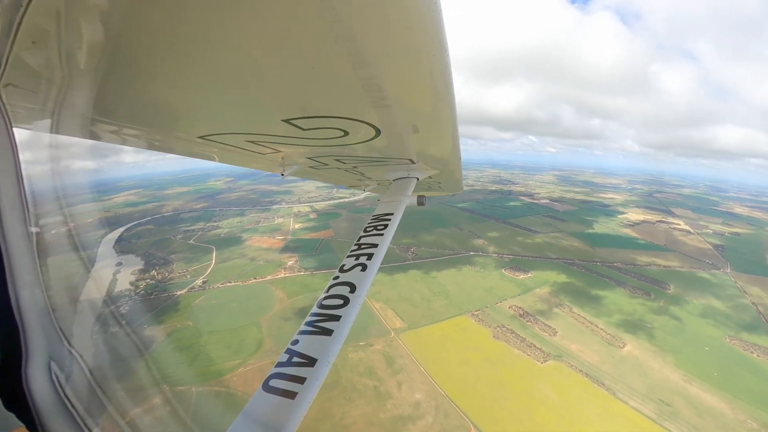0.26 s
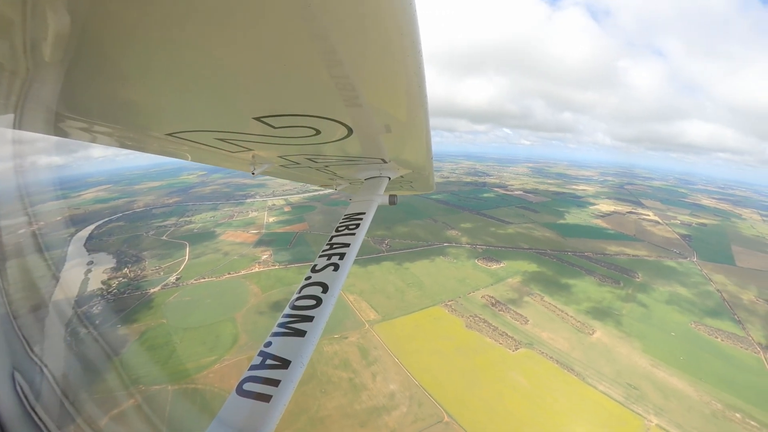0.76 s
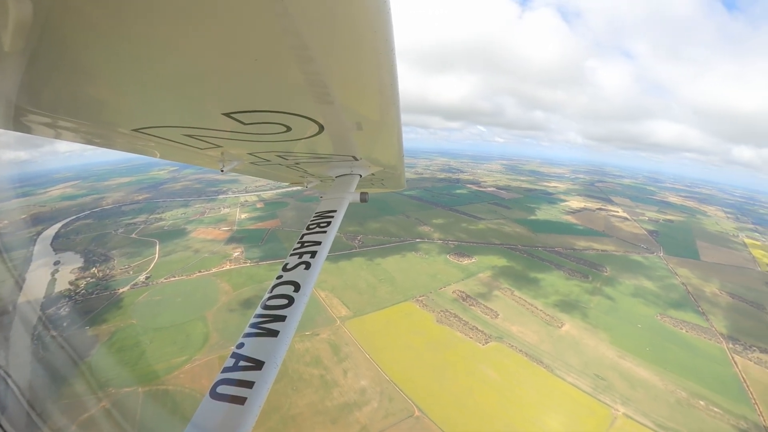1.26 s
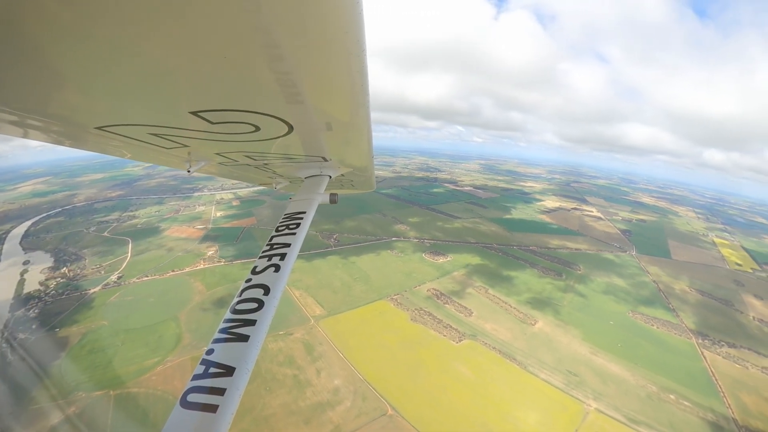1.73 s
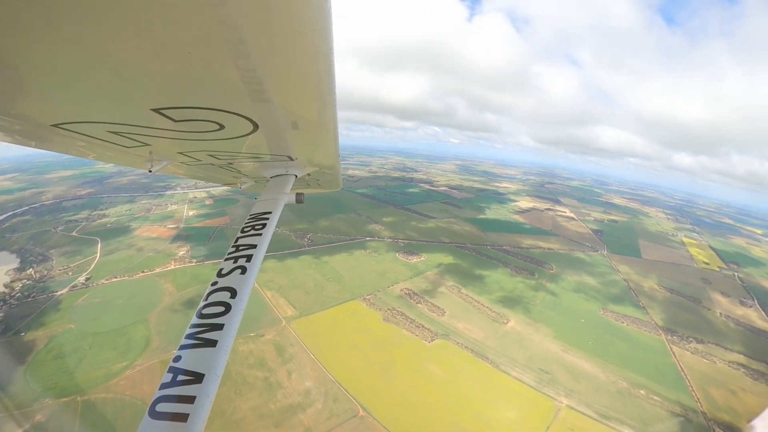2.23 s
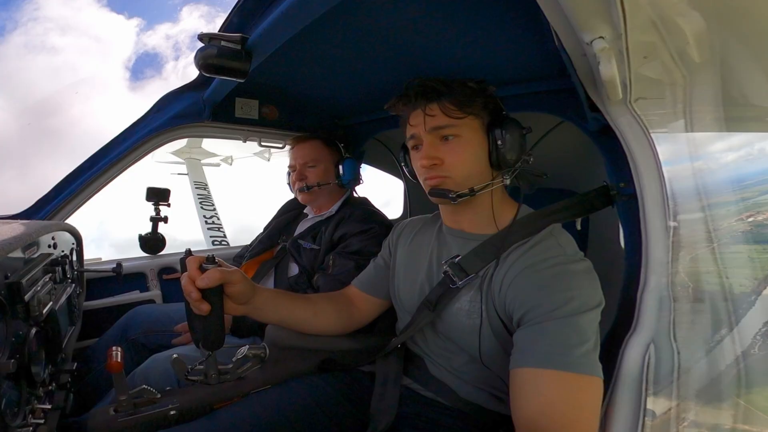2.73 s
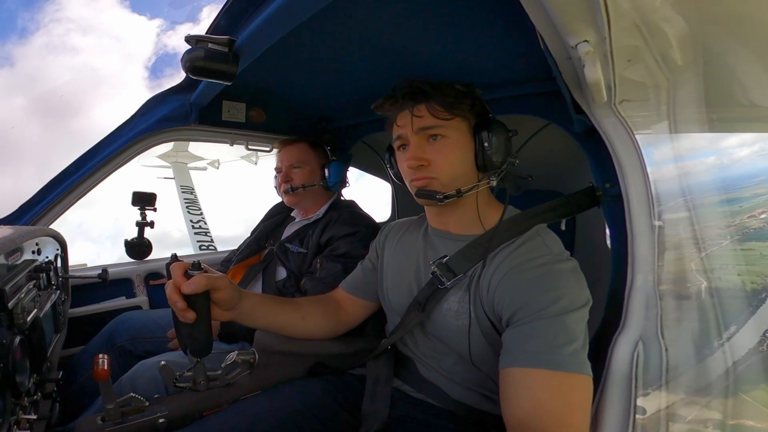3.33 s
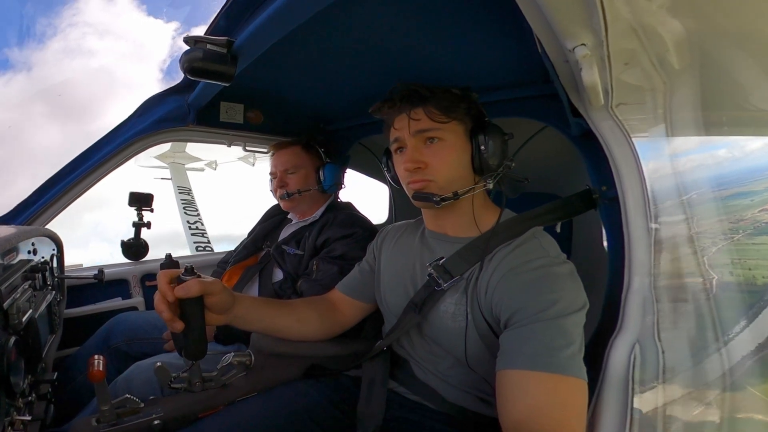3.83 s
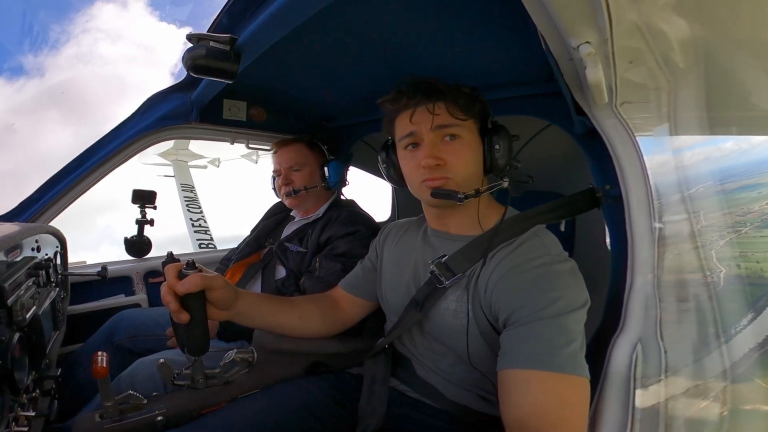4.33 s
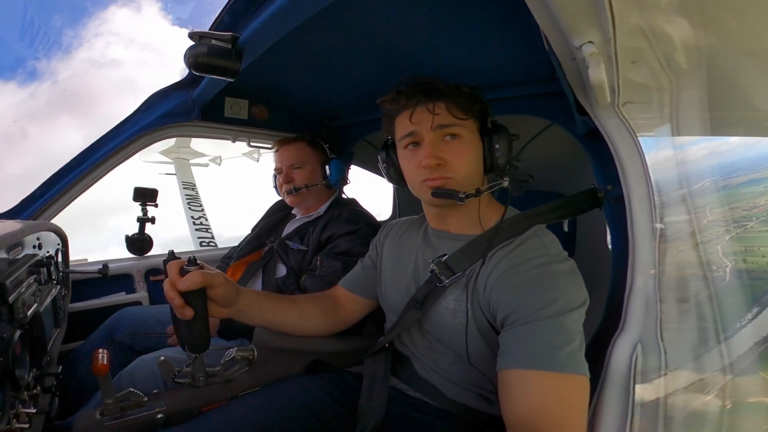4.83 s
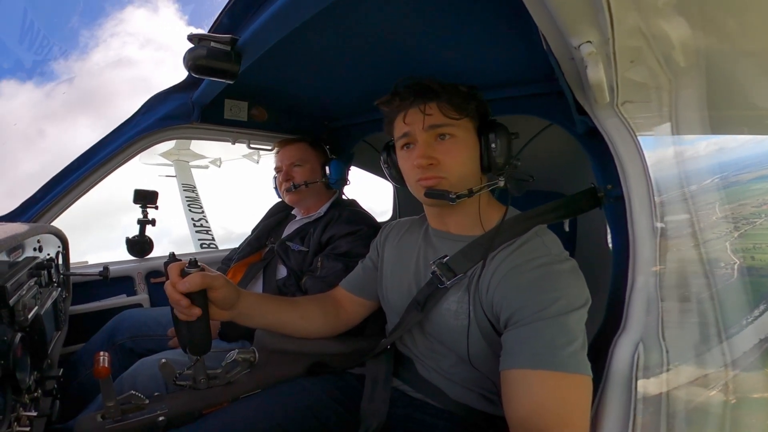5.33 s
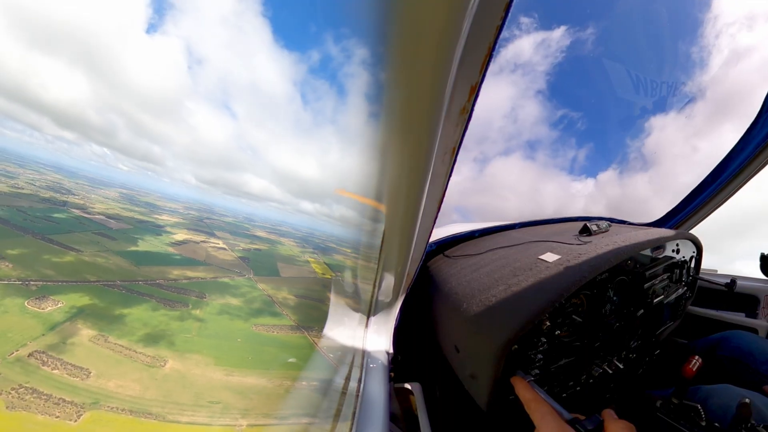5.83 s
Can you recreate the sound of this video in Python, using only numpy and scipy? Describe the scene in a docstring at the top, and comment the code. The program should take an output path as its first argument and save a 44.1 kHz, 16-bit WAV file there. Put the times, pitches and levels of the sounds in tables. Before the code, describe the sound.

From the cockpit of a light plane in flight: a deep fluttering motor hum around ninety hertz with buzzing overtones, low buffeting, and a soft rush of slipstream. It starts somewhat subdued, with a quick surge near half a second, then rises from three seconds, gaining a thin whine and sharper airy sizzle around four to five. Scattered dry ticks cause tiny dropouts. Enclosed cabin, small camera microphone, no silence.

```python
"""Engine and propeller drone inside a light aircraft in cruise: cosines at multiples of shaft speed.
The slipstream hisses past the windows as shaped noise, throbbing with the blades; a window gap sings,
and low noise buffets the cabin. At listed moments a tick sounds while the level snaps down and then
creeps back; much fainter ticks come twice a turn. A small camera hears it with a limited band."""
import sys
import numpy as np
from scipy import signal
from scipy.fft import irfft, next_fast_len
from scipy.io import wavfile
from scipy.ndimage import uniform_filter1d

SR = 44100
rng = np.random.default_rng(int(sys.argv[2]) if len(sys.argv) > 2 else 0)


def wrap_up_sound(samples):
    """Save the sound to the file named by the first command line argument, as 16-bit audio."""
    columns = np.atleast_2d(samples).T
    # keep every value between -1 and 1, then stretch to whole-number steps
    tamed = np.clip(columns, -1, 1)
    steps = np.round(tamed * 32767).astype(np.int16)
    wavfile.write(sys.argv[1], SR, steps)


def amplitude_ratio(level_db):
    """Convert a level in decibels to the matching linear amplitude (field) ratio."""
    exponent = np.asarray(level_db, float) / 20
    return 10 ** exponent


N = 267687

# Slow changes heard in the cabin, each layer taking its own share. Each row: time in seconds,
# swell of the drone in dB, swell of the slipstream in dB, brightness of the slipstream in dB.
CABIN = [(0.0, -2.5, -0.5, -10), (0.2, -4.5, -1, -7), (0.42, -3, -3, -2), (0.62, 2.5, 1, 1),
         (0.8, -3, -3.5, -2), (1.0, -4.5, -2, 2), (1.2, -2, -0.5, 6), (1.55, -2, -2, -0.5),
         (1.9, -2.5, -1, 3), (2.15, -3, -3, 7), (2.45, -2.5, 0.5, 3.5), (2.75, -2, 1, 0), (3.2, 0, 3, -1),
         (3.55, -3, 0, -3), (3.8, -2, 0.5, -3), (4.05, 0, 1, 0), (4.28, 4, 3, 4), (4.43, 4.5, 3.5, 8),
         (4.62, 3.5, 0.5, 0), (5.0, 2, 0, 4), (5.25, 2, 2.5, 1), (5.6, 0, 0, -6), (5.85, 0, 2.5, -3),
         (6.07, -1.5, 3, 1)]


def evened(x):
    """Normalization: divides by the root mean square, so that the rms is 1."""
    return x / np.sqrt(np.mean(x ** 2) + 1e-20)


def read(points, hz):
    """Spectral envelope: levels in dB interpolated along a logarithmic frequency axis."""
    f, db = np.transpose(points)
    return np.interp(np.log(hz + 1), np.log(f + 1), db)


def curves(rows):
    """Piecewise-linear control: each column joined by straight lines, one value a sample."""
    s, *columns = np.transpose(rows)
    return [np.interp(np.arange(N) / SR, s, column) for column in columns]


def hold(start, length, edge_s):
    """Smooth gating: the difference of two tanh steps rises to 1, holds and falls again."""
    s = np.arange(N) / SR
    rise = np.tanh(2 * (s - start) / edge_s)
    fall = np.tanh(2 * (s - start - length) / edge_s)
    return (rise - fall) / 2


def drift(top_hz):
    """Slow random modulation of rms 1: a sum of sines of random phase up to top_hz."""
    s = np.arange(0, N + 200, 200) / SR
    slow = 0
    for f in np.geomspace(.05, 1, 16) * top_hz:
        slow += np.sin(2 * np.pi * (f * s + rng.random())) / np.sqrt(f)
    return np.interp(np.arange(N) / SR, s, evened(slow))


def noise(spectrum, patchy_db, size):
    """Filtered noise of rms 1: random short-time spectra under an envelope with drifting patches."""
    frames = 4 * N // size + 5
    hz = np.fft.rfftfreq(size, 1 / SR)
    real, imaginary, patches = rng.standard_normal((frames, len(hz), 3)).T
    patches = uniform_filter1d(patches, size=12, axis=0)  # along frequency
    patches = evened(uniform_filter1d(patches, size=8, axis=1))  # along time
    level_db = read(spectrum, hz)[:, None] + patchy_db * patches
    z = (real + 1j * imaginary) * amplitude_ratio(level_db)
    return evened(signal.istft(z, nperseg=size, noverlap=3 * size // 4)[1][:N])


def shaft():
    """Rotation: the integral of shaft speed gives the angle, in turns, that all orders follow."""
    # Each row: time in seconds, shaft speed in Hz.
    speed_rows = [(0.0, 44.96), (0.43, 45.111), (0.87, 44.78), (1.3, 45.03), (1.73, 44.862), (2.17, 45.113),
                  (2.6, 44.902), (3.04, 45.483), (3.47, 45.909), (3.9, 45.869), (4.34, 45.737),
                  (4.77, 45.83), (5.2, 45.53), (5.64, 45.5), (6.07, 45.355)]
    start_turn = .18
    speed_hz = curves(speed_rows)[0]
    return start_turn + np.cumsum(speed_hz) / SR, speed_hz


def order(turns, multiple, db, sway, waver_db):
    """Modulated shaft order: its phase (sway, radians) and level vary with air through the propeller."""
    angle = 2 * np.pi * multiple * turns + sway * (drift(9) + 2.48 * drift(1.49))
    return -np.sqrt(2) * amplitude_ratio(db + waver_db * drift(12)) * np.cos(angle)


def booms(multiple):
    """Amplitude modulation of one order: it booms or fades for a while, in dB."""
    # Each row: start in seconds, length in seconds, multiple of the shaft speed, level change in dB.
    boom_rows = [(0.45, 0.5, 4, 9.5), (0.46, .45, 6, 9), (1.07, .72, 5, 6), (1.7, .4, 2, 2.5),
                 (2.26, 0.24, 4, 6), (2.24, .35, 6, 11), (2.6, 0.75, 6, 8), (2.72, 0.25, 3, 4),
                 (3.47, 0.16, 3, 6), (5.7, 0.44, 8, 4.5), (2.92, 0.18, 8, 6), (1.9, 0.28, 8, -8),
                 (2, 0.7, 3, -3), (5.2, 0.94, 6, 3), (.95, 1.15, 4, 4), (4.2, .9, 2, 1.5), (0, .4, 3, 5),
                 (3.35, .75, 6, 3), (2.9, .65, 5, 3), (2.3, .55, 8, 1.5), (5.75, .35, 4, 3),
                 (5.75, .4, 2, 2), (4.25, .7, 5, -3), (.22, .24, 4, 7), (1.78, .2, 3, 5),
                 (.45, .35, 3, 1.5), (4.3, .45, 4, 2), (5.2, .2, 5, 3), (5.75, .3, 5, 4), (5.1, .6, 8, 2),
                 (3.1, .85, 3, 2), (0, .9, 8, 1), (1.4, .4, 8, 2), (3.0, .6, 8, 1.5), (3.7, .35, 8, -3),
                 (.95, 1.5, 4, 1)]
    return sum(db * hold(s, length, 0.062) for s, length, m, db in boom_rows if m == multiple)


def stroke_gain(turns):
    """Cycle-to-cycle variation: each turn beats a little stronger or weaker."""
    spread_db, every_other_db = 1.1, .3
    whole = np.arange(int(turns[-1]) + 2)
    strokes_db = spread_db * rng.standard_normal(len(whole)) + every_other_db * (-1.) ** whole
    return amplitude_ratio(np.interp(turns, whole, strokes_db))


def loud_orders(turns, speed_hz):
    """Harmonic series locked to the shaft: low multiples sum to the beating drone."""
    # Each row: multiple of the shaft speed, base rms level in dB, share of the drone's swell,
    # level change in dB for each Hz above cruise speed.
    order_rows = [(2, -39, 0.43, 1), (3, -39, 2.17, -4.5), (4, -45, 0.85, -5.5), (5, -46, 1.25, 8),
                  (6, -47, 1.22, 3.5), (8, -55.5, 0.24, 3)]
    cruise_hz = 45.4
    shared_sway_turns = 0.013  # each of two drifts moves all loud orders early or late together
    slip_cycles, slip_mid_hz, slip_span_hz = .2, 45.25, .15
    swell_db = curves(CABIN)[0]
    swaying = turns + shared_sway_turns * (drift(9) + drift(1.45))
    # orders above the second trail it at low speed and lead it at high speed
    slip = slip_cycles * np.tanh((speed_hz - slip_mid_hz) / slip_span_hz)
    loud = 0
    for k, base_db, share, db_per_hz in order_rows:
        db = base_db + share * swell_db + db_per_hz * (speed_hz - cruise_hz) + booms(k)
        order_turns = swaying + (k > 2) * slip / k
        loud += order(order_turns, k, db, sway=0.1 + 0.004 * k ** 2, waver_db=0.7 + 0.008 * k ** 2)
    return loud * stroke_gain(turns)


def faint_orders(turns):
    """Weak whole and half orders: each follows the shaft from a random starting phase."""
    # Each row: multiple of the shaft speed, base rms level in dB.
    faint_rows = [(1, -66), (1.5, -89), (2.5, -61), (3.5, -71), (6.5, -57.5), (7, -61), (8.5, -67.5),
                  (9, -63.5), (9.5, -62.5), (10, -61), (12, -74), (13.5, -74.5), (18.5, -76)]
    swell_db = curves(CABIN)[0]
    faint = 0
    for k, db in faint_rows:
        faint += order(turns + rng.random(), k, db + .5 * swell_db, sway=0.49, waver_db=2.2)
    return faint


def whine(turns):
    """High shaft harmonics: multiples 14 and 16 sound as a thin whine that stands out for a while."""
    whine_db = -78 + 14.6 * hold(2.95, 2.2, 0.21)
    peak_db = 2.3 * hold(3.98, 0.46, .15)
    lower = order(turns, 14, whine_db - 2.5, sway=.26, waver_db=2.)
    upper = order(turns, 16, whine_db + peak_db, sway=0.23, waver_db=1.6)
    return amplitude_ratio(0.15 * curves(CABIN)[0]) * (lower + upper)


def engine(turns, speed_hz):
    """Superposition: loud orders, faint orders and whine share one shaft."""
    return loud_orders(turns, speed_hz) + faint_orders(turns) + whine(turns)


def snaps(x, turns):
    """Impulse and relaxation: a tick, an abrupt fall in level, then exponential recovery."""
    # Each row: time in seconds, tick level in dB ahead of the common gain, brightest part in Hz.
    snap_rows = [(0.0636, -58, 8600.0), (0.1517, -60, 6900.0), (0.2623, -58, 7600.0), (0.354, -55, 1100),
                 (0.5062, -56, 5700.0), (0.6134, -57, 6500.0), (0.6401, -59, 15000.0),
                 (0.7293, -62, 7800.0), (0.7511, -58, 8800.0), (0.9078, -57, 7400.0), (1.0857, -56, 5200.0),
                 (1.1972, -57, 5200.0), (1.2637, -56.5, 6900.0), (1.4868, -60, 7200.0),
                 (1.5752, -59, 7100.0), (1.6643, -57, 5500.0), (1.8202, -59, 5030), (1.9981, -57, 8600.0),
                 (2.1538, -60, 5500.0), (2.3086, -57, 4800.0), (2.4866, -56, 14300.0), (2.8644, -60, 5260),
                 (3.0562, -58, 5500), (3.0844, -54, 7000.0), (3.3491, -59, 7900.0), (3.4136, -60, 7870),
                 (3.5878, -57, 5000.0), (3.6529, -60, 6500.0), (3.6966, -60, 7400.0), (3.7829, -57, 7800.0),
                 (3.914, -59, 9000.0), (3.981, -60, 6500), (4.046, -59, 6000), (4.1811, -52, 14600.0),
                 (4.1975, -56, 7000.0), (4.2193, -55, 7200.0), (4.4056, -59, 6400.0), (4.4379, -56, 9300.0),
                 (4.5583, -58, 5300.0), (4.571, -58, 8300.0), (4.6777, -59, 8300.0), (4.822, -60, 8400.0),
                 (4.985, -60, 6000), (5.0514, -56, 8400.0), (5.314, -59, 7000), (5.4231, -59, 5500.0),
                 (5.6521, -59, 6500.0)]
    # Tick spectrum. Each row: frequency in Hz, relative level in dB.
    tick_spectrum = [(150, -30), (350, 15), (700, 16), (1500, 4), (5000, -10), (9000, -16), (12000, -22),
                     (15000, -24)]
    usual_tick_db, fall_at_usual_db, fall_share = -52, 3.5, 0.32  # louder ticks pull the level lower
    recovery_s, tick_gain_db = .09, 29.3
    # faint ticks, without a fall, come every half turn: near a trough of the second order
    troughs = np.flatnonzero(np.diff(np.floor(2 * turns))) / SR + .001
    size, pitch = rng.random((len(troughs), 2)).T
    faint_db = -81.5 - 6.0 * np.log(np.maximum(size, .05))
    faint = np.transpose([troughs, faint_db, 4500 * 2 ** (1.2 * pitch)])
    s, tick_db, top_hz = np.vstack([snap_rows, faint]).T
    at = (s * SR).astype(int)
    hz = np.fft.rfftfreq(512, 1 / SR)
    octaves = np.log2((hz + 1) / top_hz[:, None])
    bump_db = 8 * np.exp(-(octaves / .28) ** 2)
    pulses = irfft(amplitude_ratio(read(tick_spectrum, hz) + bump_db + tick_db[:, None]))
    shapes = -np.roll(pulses, 256, axis=1) * np.hanning(512)
    ticks, steps = np.zeros((2, N + 1024))
    np.add.at(ticks, at[:, None] + np.arange(512), shapes)
    listed = slice(len(snap_rows))
    falls_db = fall_at_usual_db + fall_share * (tick_db[listed] - usual_tick_db)
    steps[at[listed]] = np.maximum(falls_db, 0)
    fall_db = signal.lfilter([1], [1, -np.exp(-1 / (recovery_s * SR))], steps[:N])
    fall_db = uniform_filter1d(fall_db - fall_db.mean(), size=16)  # the mean level is kept in dB
    return x / amplitude_ratio(fall_db) + amplitude_ratio(tick_gain_db) * ticks[256:N + 256]  # pulses centred on their times


def gusts():
    """Transient flow: Gaussian rises in dB, shared by the hiss bands, the whistle and the buffeting."""
    # Each row: peak time in seconds, length in seconds, rise in dB.
    gust_rows = [(0.44, 0.15, 4), (2.764, 0.054, 2.5), (3.03, 0.06, 2.5), (4.18, 0.1, 4.5),
                 (1.655, 0.28, 2.5), (4.55, 0.06, 1.5), (5.24, 0.079, 0), (4.79, .06, 2)]
    s = np.arange(N) / SR
    return sum(db * np.exp(-(2 * (s - peak) / length) ** 2) for peak, length, db in gust_rows)


def hiss(gusts_db):
    """Broadband flow noise in three bands: hiss follows rush, fizz brightness, treble both."""
    # Spectra of the bands. Each row: frequency in Hz, relative level in dB.
    hiss_spectrum = [(300, -6), (600, -0.5), (1100, -5), (1700, -4.5), (2050, -4), (2200, -2), (2500, -2),
                     (2900, -3), (3150, -4), (3420, -9.5), (3550, -8.5), (3770, -10), (3900, -11),
                     (5200, -24), (7000, -47)]
    treble_spectrum = [(3000, 4), (5000, 4), (6500, 9.5), (7800, 3.5), (10300, 8.5), (11500, -2),
                       (13000, -21)]
    fizz_spectrum = [(9000, -10), (11500, 1), (13500, 4), (14200, -2), (14900, -2), (15600, 2)]
    _, rush_db, bright_db = curves(CABIN)
    treble_gusts_db = 1.08 * gusts_db
    hiss_db = -54 + rush_db + gusts_db
    treble_db = -71 + 0.7 * rush_db + 0.3 * bright_db + treble_gusts_db
    treble_db -= 3 * hold(4, 1.4, .05)  # 3 dB lower from 4 to 5.4 s
    fizz_db = -73.5 + bright_db + treble_gusts_db
    bands = amplitude_ratio(hiss_db) * noise(hiss_spectrum, 1.09, size=1024)
    bands += amplitude_ratio(treble_db) * noise(treble_spectrum, 1.4, size=512)
    return bands + amplitude_ratio(fizz_db) * noise(fizz_spectrum, 1.2, size=512)


def sizzle():
    """Gated band noise: for a while the slipstream sharpens, with short bursts."""
    # Each row: frequency in Hz, relative level in dB.
    sizzle_spectrum = [(2800, -9), (3600, 5.5), (4600, -9.5), (6000, -14.5), (7500, -21), (9500, -30),
                       (11500, -19), (14000, -22), (15600, -24)]
    # Each row: start in seconds, length in seconds, rise in dB.
    burst_rows = [(4.47, 0.13, 6), (4.77, .12, 2.5), (5.17, 0.15, 2)]
    bursts_db = sum(db * hold(s, length, 0.049) for s, length, db in burst_rows)
    return hold(4, 1.4, .05) * amplitude_ratio(-63.5 + bursts_db) * noise(sizzle_spectrum, 1.6, size=512)


def whistle(gusts_db):
    """Frequency-shifted narrowband noise: a window gap sings at a wandering pitch."""
    # Each row: frequency in Hz, relative level in dB.
    whistle_spectrum = [(2300, -29), (2480, -8), (2580, -3.5), (2680, 3.5), (2800, -8), (2950, -31.5)]
    wander_hz = 35  # rms
    rush_db = curves(CABIN)[1]
    shift = np.exp(2j * np.pi * np.cumsum(wander_hz * drift(4)) / SR)
    analytic = signal.hilbert(noise(whistle_spectrum, 2.9, size=1024), next_fast_len(N))[:N]
    level_db = -64.5 + rush_db + 0.84 * gusts_db + drift(7.9)
    return amplitude_ratio(level_db) * (analytic * shift).real


def rasp():
    """Gated band noise: one short rough puff of air."""
    # Each row: frequency in Hz, relative level in dB.
    rasp_spectrum = [(1500, -17), (1900, 2), (2250, -3), (2650, 2), (3100, -21.5)]
    return hold(3.004, .054, 0.0087) * amplitude_ratio(-52) * noise(rasp_spectrum, 1.0, size=256)


def slipstream(turns, gusts_db):
    """Amplitude modulation: the air noise throbs with each passing blade and each turn."""
    throb = 1 + 0.062 * np.cos(4 * np.pi * turns) + 0.034 * np.cos(2 * np.pi * turns)
    flutter_db = 0.5 * drift(25)
    rushing = hiss(gusts_db) + sizzle() + whistle(gusts_db) + rasp()
    return throb * amplitude_ratio(flutter_db) * rushing


def buffeting(gusts_db):
    """Low-frequency turbulence noise: buffeting air shakes the cabin."""
    # Each row: frequency in Hz, relative level in dB.
    buffet_spectrum = [(30, -19), (55, -52), (80, -7.5), (100, -7), (125, 2), (190, 0.5), (300, -9),
                       (450, -20.5), (560, -26), (1000, -60.5)]
    level_db = -39 + 0.8 * curves(CABIN)[0] + gusts_db + 0.25 * drift(5.8)
    return amplitude_ratio(level_db) * noise(buffet_spectrum, 0.96, size=4096)


def scene():
    """Superposition: engine and air add, and the snaps act on their sum."""
    turns, speed_hz = shaft()
    gusts_db = gusts()
    air = slipstream(turns, gusts_db) + buffeting(gusts_db)
    return snaps(engine(turns, speed_hz) + air, turns)[None]


def band_limit(x):
    """A steep low-pass at the top of the band."""
    return signal.sosfilt(signal.butter(12, 15820, fs=SR, output="sos"), x)


def record(dry):
    """Band limiting: the camera cuts the deepest bass and the extreme top."""
    low_cut = signal.butter(2, 48, "high", fs=SR, output="sos")
    top_cut = signal.firwin(801, 15760, fs=SR)[None]
    without_bass = signal.sosfiltfilt(low_cut, dry)
    mix = signal.oaconvolve(without_bass, top_cut, "same")
    return band_limit(mix)


dry = scene()
out = record(dry)
wrap_up_sound(out)
```